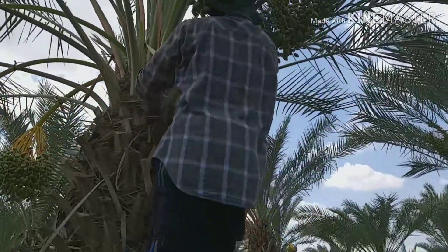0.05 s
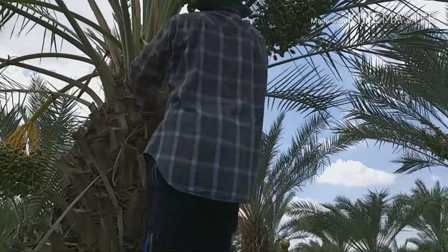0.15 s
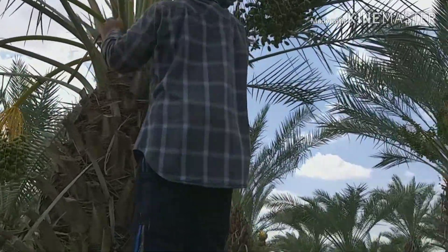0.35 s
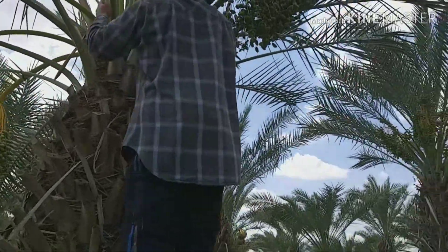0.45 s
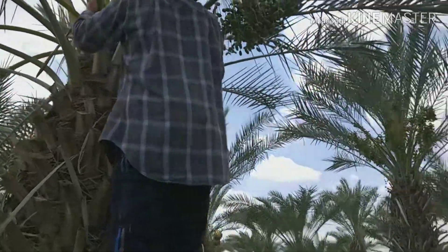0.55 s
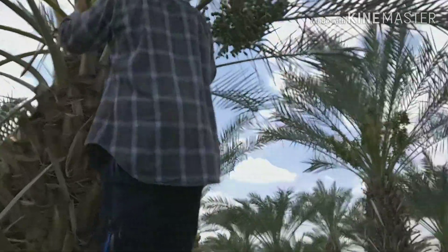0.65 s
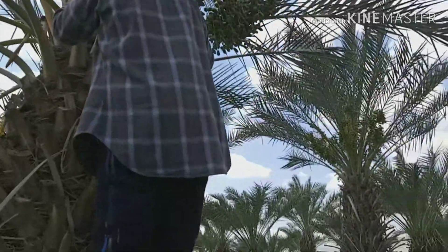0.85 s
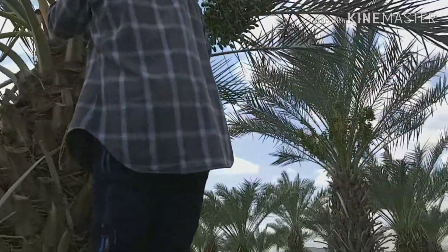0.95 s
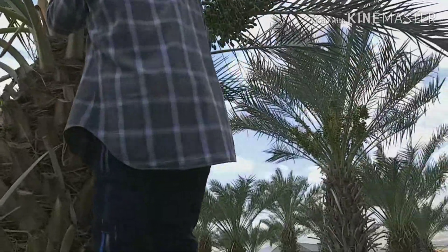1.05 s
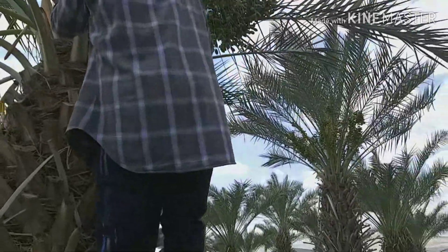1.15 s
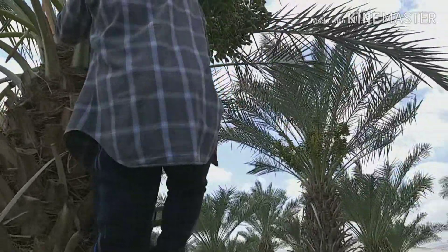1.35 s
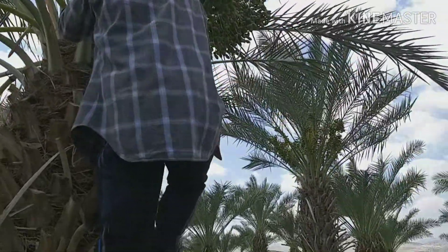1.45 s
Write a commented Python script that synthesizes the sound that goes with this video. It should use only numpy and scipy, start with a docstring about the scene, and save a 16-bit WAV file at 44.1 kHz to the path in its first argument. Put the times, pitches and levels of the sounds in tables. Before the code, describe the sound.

A woody palm stalk cracks and splinters, then dry leaflets rustle and tick.

```python
"""A quiet grove, the microphone close to the crown of a date palm where someone is working.
First a woody stalk gives way, near centre, in a quick run of cracks: fibres tear and the wood rings.
Dry leaflets snap and tick with it, then keep rustling while the stalks rub and tap on each other.
At the end another crunch begins, and a stalk knocks on the trunk."""
import sys
import numpy as np
from scipy import signal
from scipy.fft import rfft, irfft
from scipy.io import wavfile

SR = 44100
rng = np.random.default_rng(int(sys.argv[2]) if len(sys.argv) > 2 else 0)


def transcribe(u):
    """Save the signal u as a 16-bit wav file named by the first command-line argument.

    u: samples, shape (n,) or (channels, n), limited to [-1, 1]; the rate is SR.
    q: integer samples, one column per channel.
    """
    v = np.clip(np.atleast_2d(u).T, -1, 1)
    q = np.round(v * 32767).astype(np.int16)
    wavfile.write(sys.argv[1], SR, q)


N = 66150


def stalk_cracks():
    """Each break thumps at its own pitch and sets the stalk ringing; the trunk takes the recoil."""
    # breaks in the stalk: t/s, level/dB, pitch/Hz, splintering time/ms, low cut/Hz, ring/cycles
    cracks = [(0.1518, -34.5, 2870, 0.48, 840, 11), (.1720, -28, 2320, 1.3, 455, 9),
              (.1990, -37.5, 2020, 5.1, 600, 3), (0.2250, -19.5, 2670, 0.42, 650, 8.5),
              (0.2264, -15, 2836, 0.83, 596, 11), (0.2280, -25.5, 900, 1.6, 306, 0.78),
              (0.2335, -24, 2640, 1.2, 798, 6.6), (0.2409, -22.5, 2100, 0.35, 1034, 2.4),
              (0.2417, -7, 1510, 0.13, 964, 11), (0.2444, -14.5, 1160, 0.59, 110, 5.6),
              (0.2477, -27, 1400, 0.68, 369, 3), (0.2546, -21, 2900, 0.37, 900, 5),
              (0.2549, -22.5, 1200, 0.68, 900, 5.7), (0.2611, -35, 1307, 0.55, 200, 5),
              (0.3084, -31, 1560, 0.22, 755, 3.3), (0.3742, -31.5, 2450, 2.2, 810, 8.6),
              (0.4066, -35, 3200, 1.3, 1200, 2.5), (0.4077, -22, 1930, 0.3, 1010, 7.2),
              (0.4092, -36, 1320, 1.8, 120, 2.9), (0.4485, -40.5, 1930, 0.59, 1030, 6.3),
              (0.5555, -42, 1890, 1.9, 690, 1.3), (.7441, -38.5, 4000, 0.24, 3290, 19),
              (0.922, -39, 1640, 1, 1200, 39), (0.9292, -39, 1690, 2.1, 1130, 45),
              (1.4686, -39.5, 2100, 2.6, 2000, 5), (1.4740, -36, 3600, .8, 2200, 4),
              (1.4828, -39, 1800, 1.2, 450, 2), (1.4855, -34, 2300, 0.63, 450, 1.5),
              (1.4894, -30, 950, 0.64, 150, 9), (1.4902, -31, 2900, 0.22, 1200, 5.5),
              (1.4915, -35, 1500, 0.23, 504, 2.2), (1.4958, -37, 2000, 0.89, 200, 6),
              (1.4978, -31.5, 1880, .35, 400, 5.7)]
    # the stalk's resonances: f/Hz, level/dB, t60/s
    modes = [(110, -13.5, 0.0417), (183, -1.5, 0.029), (331, -4, 0.034), (472, -11, 0.065),
             (594, -6.5, 0.012), (784, -5, 0.037), (1130, -2, 0.017), (1239, -1.5, 0.035),
             (1446, -8.5, .03), (1659, 4.5, 0.013), (1923, 3, 0.014), (2280, -3, 0.011),
             (2510, -8.5, 0.019), (3138, -5.5, 0.013)]
    spread_db, detune = 2.5, 0.016  # each break lies elsewhere on the stalk and rings a little differently
    radiation_hz = 1200  # a narrow stalk radiates poorly below this
    out = np.zeros(N)
    for s, db, hz, ms, low_hz, cycles in cracks:
        force = fracture(ms, splinter_db=1.5 + 10 * np.log10(ms))
        thump = ring(force, hz, cycles / hz)
        thump += from_db(-24) * ring(force, 1.9 * hz, cycles / hz)  # second bending mode
        body = 0
        for mode_hz, mode_db, t60 in modes:
            gain = from_db(mode_db + spread_db * rng.standard_normal())
            body += gain * ring(force, mode_hz * (1 + detune * rng.standard_normal()), t60)
        wood = cut(thump + from_db(-16.5) * body, 1.94 * hz, "low", order=3)  # the wood dulls the crack
        edge = from_db(-11) * cut(force, 4500, "high")
        crack = cut(wood + edge, low_hz, "high", order=3)  # thin pieces have no bass
        add(out, s, db, cut(crack, radiation_hz, "high", order=1))
        recoil = np.diff(ring(force, hz=218, t60=0.03), prepend=0)
        add(out, s, db - 39, recoil)
    return out


def leaflet_snaps():
    """Dry leaflets break with a thin, bright tick and shiver briefly afterwards."""
    # breaks in the leaflets: t/s, level/dB, pitch/Hz, splintering time/ms, ring/cycles
    snaps = [(0.076, -46, 11700, 1.3, 20), (0.0928, -42.5, 11670, 1.6, 28), (0.1465, -46, 12100, 0.66, 17),
             (0.1522, -33, 11000, 1.7, 4), (0.1695, -28.5, 12900, 3.5, 4.8), (0.1984, -21, 13500, 3.4, 12),
             (0.227, -25, 7280, 3.7, 1.5), (0.2419, -13.5, 11880, 1.1, 2), (0.2549, -33, 7740, 0.71, 3),
             (0.272, -36, 11000, 1.2, 3.6), (0.2792, -36, 6540, 1.52, 13), (0.3065, -41, 12000, 1.4, 8),
             (0.335, -44, 12000, 1.9, 5.3), (0.3582, -40, 11200, 1.3, 4.5), (0.376, -42, 6940, 0.79, 4.7),
             (0.4059, -22, 11200, 2.4, 1.8), (0.431, -27.5, 13700, 0.25, 11),
             (0.4468, -39, 12000, 0.7, 5.5), (0.4679, -29.5, 11200, 0.37, 2.2),
             (0.5081, -45, 4700, 0.44, 10), (0.5558, -34, 12400, 0.26, 3.7),
             (0.6052, -40, 12000, 0.97, 4.4), (0.62, -39.5, 9360, 0.78, 10), (0.622, -45, 12000, 0.3, 9.1),
             (0.636, -45, 12600, 0.54, 12), (0.73, -40.5, 13100, 0.66, 7.7), (.7441, -31.5, 8140, 0.4, 3.2),
             (0.7494, -39.5, 10900, 4.3, 4.1), (1.0415, -43.5, 10670, 0.37, 4.2),
             (1.1268, -38.5, 11950, 0.29, 26), (1.202, -40, 11870, 0.54, 12), (1.2989, -36, 12200, .4, 4.3),
             (1.4731, -32, 12100, 1.1, 9.3), (1.4842, -32, 12000, 5.9, 4.4)]
    shiver_db, shiver_s = -8, 0.0086
    out = np.zeros(N)
    for s, db, hz, ms, cycles in snaps:
        tear = fracture(ms, splinter_db=24)
        t = np.arange(len(tear)) / SR
        shiver = rng.standard_normal(len(t)) * np.exp(-t / shiver_s)
        force = unit(tear) + from_db(shiver_db) * unit(shiver)
        tone = unit(np.diff(ring(force, hz, cycles / hz), prepend=0))
        edge = from_db(-23.5) * force
        add(out, s, db, cut(tone + edge, 3180, "high"))
    return out


def stalk_taps():
    """Two stalks meet in soft, scuffing contacts that all ring with the same few modes."""
    # contacts: t/s, level/dB, contact time/ms
    taps = [(0.863, -46.5, 1.1), (1.098, -48.5, 2.4), (1.12, -48.5, 2.1), (1.131, -44, 2.5),
            (1.180, -42.5, 2.5), (1.2036, -37, 2), (1.280, -44.5, 2.2)]
    # resonances of the tapped stalks: f/Hz, level/dB, t60/s
    modes = [(1660, -4, 0.015), (1872, -1, 0.051), (2900, -1.5, .004), (3420, 2.5, 0.0074),
             (3760, -4, 0.0074)]
    out = np.zeros(N)
    for s, db, ms in taps:
        force = fracture(ms, splinter_db=1.5)
        tone = sum(from_db(mode_db) * ring(force, hz, t60) for hz, mode_db, t60 in modes)
        thin = cut(tone, 1480, "high", order=4)
        add(out, s, db, cut(thin, 4200, "low", order=6))
    return out


def trunk_bump():
    """The last crunch shoves the stalk against the trunk: a short, dull thud."""
    s, db, hz, t60 = 1.4885, -43, 120, .03
    out = np.zeros(N)
    thud = ring(fracture(ms=1, splinter_db=0), hz, t60)
    add(out, s, db, cut(thud, hz / 2, "high"))
    return out


def leaflet_rustle():
    """Leaflets brush each other with a fine, bright grain."""
    # strength of the brushing: t/s, level/dB
    brushing = [(0, -52), (.13, -56), (.19, -54), (.215, -42.5), (.26, -42.5), (.32, -46.5), (.42, -40.5),
                (.50, -49), (.60, -46), (.70, -50), (.80, -55), (.93, -40), (1.0, -50.5), (1.07, -51),
                (1.17, -48), (1.24, -51), (1.29, -44.5), (1.33, -49), (1.40, -43.5), (1.46, -50),
                (1.5, -45.5)]
    # spectrum of the rustle: f/Hz, level/dB
    colour = [(2600, -29.5), (3500, -15.5), (5800, -17), (7500, -10.5), (9500, -4), (12000, -3), (16000, 0)]
    friction = grains(per_s=4900, spread_db=5, size=N) + rng.standard_normal(N)
    return level(brushing) * coloured(friction, colour)


def stalk_rub():
    """Stalks rub each other with a coarser, lower grain."""
    # strength of the rubbing: t/s, level/dB
    rubbing = [(0, -66.5), (.14, -81), (.16, -60), (.20, -52), (.28, -48.5), (.33, -54), (.42, -51),
               (.52, -59), (.58, -57.5), (.68, -66.5), (.815, -67.5), (.833, -55), (.85, -62), (.89, -54),
               (.915, -54), (.935, -44.5), (.96, -55), (1.01, -58), (1.04, -68), (1.09, -72.5),
               (1.105, -56), (1.16, -61.5), (1.21, -56), (1.25, -61.5), (1.33, -60.5), (1.40, -53),
               (1.455, -65), (1.5, -38.5)]
    # spectrum of the rub: f/Hz, level/dB
    colour = [(100, -36.5), (300, -16), (550, -8), (900, -6.5), (1300, -11), (1750, 0.5), (2500, -4),
              (3600, 1.5), (4700, -4), (6000, -14.5), (10000, -10.5)]
    friction = grains(per_s=4000, spread_db=2, size=N) + 0.19 * rng.standard_normal(N)
    return level(rubbing) * coloured(friction, colour)


def reflections(x):
    """Sound comes back off the trunk and the worker's body close by, and off the crowns around."""
    # response of the trunk and body: f/Hz, gain/dB
    near_colour = [(200, 0.5), (1500, -3.5), (5000, -1.5), (12000, 2)]
    # response of the surrounding crowns: f/Hz, gain/dB
    crown_colour = [(200, 0), (600, 1.5), (1100, -13.5), (1700, -15.5), (3000, 1), (6000, 3), (12000, -3.5)]
    near = from_db(-12) * echoes(x, t60=0.031, colour=near_colour)
    crowns = from_db(-17) * echoes(x, t60=0.34, colour=crown_colour)
    return near + crowns


def far_tail(x, t60=1.55):
    """So many distant leaves scatter the sound that only its energy returns, as a pitchless wash."""
    # spectrum of the distant wash: f/Hz, level/dB
    colour = [(150, -16), (500, -14), (800, 0), (1150, 1.5), (1700, 4), (3000, -12), (8000, -24.5)]
    t = np.arange(N) / SR
    fade = unit(from_db(-60 * t / t60) * (1 - np.exp(-t / .02)))
    energy = np.maximum(signal.fftconvolve(x ** 2, fade ** 2)[:N], 0)
    return np.sqrt(energy) * coloured(rng.standard_normal(N), colour)


def grove_ambience():
    """The grove's faint, steady bed; a trace of low rumble differs between left and right."""
    # spectrum of the quiet grove: f/Hz, level/dB
    colour = [(25, -9), (50, -11), (80, 3), (130, -3.5), (250, -12), (420, -11), (950, -3), (1400, -16),
              (2000, -8.5), (2700, -30.5), (8000, -29), (16000, -23.5)]
    bed = from_db(-68) * coloured(rng.standard_normal(N), colour)
    rumble = cut(rng.standard_normal(N), 60, "low", order=1)
    side = from_db(-98) * np.sqrt(N) * unit(rumble)
    return np.array([bed + side, bed - side])


def fracture(ms, splinter_db):
    """The force of one break: a click, then a run of tearing fibres that swells and dies."""
    burst_s, rise_s = .08, 0.00047
    t = np.arange(int(burst_s * SR)) / SR
    fade = np.exp(-t * 1000 / ms) * (1 - np.exp(-t / rise_s))
    fibres = grains(per_s=12000, spread_db=1, size=len(t))
    return (t == 0) + from_db(splinter_db) * unit(fibres * fade)


def grains(per_s, spread_db, size):
    """Random clicks of uneven strength."""
    strength = from_db(spread_db * np.minimum(rng.exponential(1, size), 4))
    return (rng.random(size) < per_s / SR) * strength * rng.standard_normal(size)


def ring(x, hz, t60):
    """One resonance: each click sets a decaying sine ringing."""
    r, w = from_db(-60 / (t60 * SR)), 2 * np.pi * hz / SR
    return signal.lfilter([0, np.sin(w)], [1, -2 * r * np.cos(w), r * r], x + 1e-18)


def echoes(x, t60, colour):
    """Many small reflections that build up and die away."""
    t = np.arange(N) / SR
    fade = from_db(-60 * t / t60) * (1 - np.exp(-t / .004))
    response = unit(rng.standard_normal(N) * fade)
    return filtered(signal.fftconvolve(x, response)[:N], per_bin(colour))


def add(out, s, db, sound):
    """Mixes in a short sound at time s, with the energy of 1.5 ms at an rms level of db."""
    i = min(int(s * SR), N - 1)
    out[i:i + len(sound)] += (from_db(db) * np.sqrt(.0015 * SR) * unit(sound))[:N - i]


def from_db(db):
    """Decibels to gain."""
    return 10 ** (np.asarray(db) / 20)


def unit(x):
    """Scales to energy 1."""
    return x / np.sqrt(np.sum(x ** 2) + 1e-20)


def level(rows):
    """Gain over time from (t/s, level/dB) points."""
    return from_db(np.interp(np.arange(N) / SR, *np.transpose(rows)))


def per_bin(points):
    """Spreads (f/Hz, level/dB) points over the frequency grid."""
    hz, db = np.transpose(points)
    return np.interp(np.log(np.arange(N // 2 + 1) * SR / N + 1), np.log(hz), db)


def coloured(x, spectrum):
    """Shapes x with a spectrum and scales it to rms 1."""
    return unit(irfft(rfft(x) * from_db(per_bin(spectrum)), N)) * np.sqrt(N)


def cut(x, hz, kind, order=2):
    """High- or low-pass filter."""
    return signal.sosfilt(signal.butter(order, min(hz, .45 * SR), kind, fs=SR, output="sos"), x)


def filtered(x, db):
    """Applies a gain in dB at each frequency."""
    return irfft(rfft(x, 2 * N) * from_db(np.repeat(db, 2)[:N + 1]))[:N]


def panned(x, balance):
    """Leans a mono sound left or right by frequency."""
    return np.array([filtered(x, side * per_bin(balance) / 2) for side in (1, -1)])


def scene():
    """The palm's crown close up and almost centre, with the grove behind it."""
    # stereo lean of the wood and the echoes: f/Hz, left minus right/dB
    stalk_balance = [(100, -1), (750, 0), (1400, 1.94), (2300, 1.64), (3200, 0), (16000, 0.5)]
    # stereo lean of the snaps and the friction: f/Hz, left minus right/dB
    leaf_balance = [(100, 0.96), (7500, 0), (9300, -4), (11000, 0), (16000, 0)]
    wood = stalk_cracks() + stalk_taps() + trunk_bump()
    snaps = leaflet_snaps()
    space = reflections(wood + snaps) + from_db(-26) * far_tail(wood + snaps)
    friction = leaflet_rustle() + stalk_rub()
    return panned(wood + space, stalk_balance) + panned(snaps + friction, leaf_balance) + grove_ambience()


def record(dry):
    """A steep low-pass on the microphone signal, 70 dB down from 16.3 kHz."""
    return signal.sosfilt(signal.cheby2(18, 70, 16300, fs=SR, output="sos"), dry)


dry = scene()
out = record(dry)
transcribe(out)
```